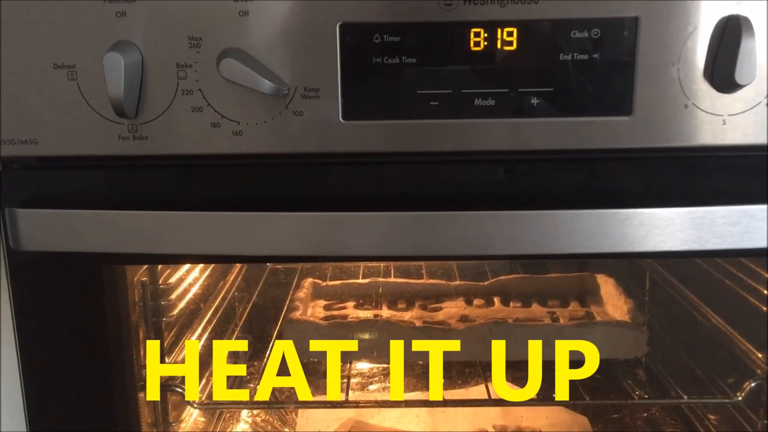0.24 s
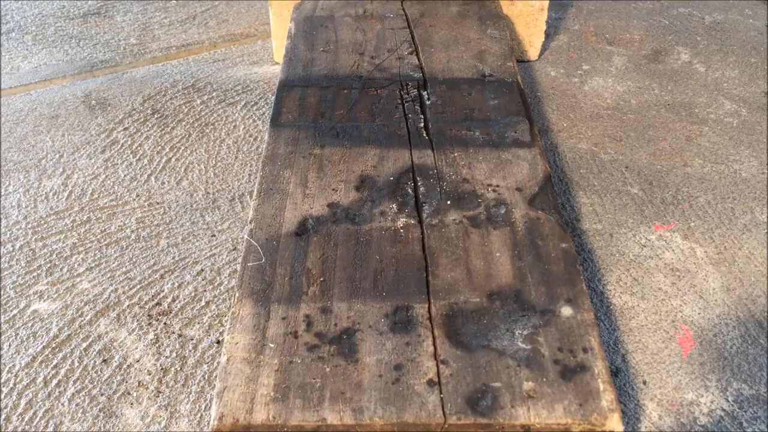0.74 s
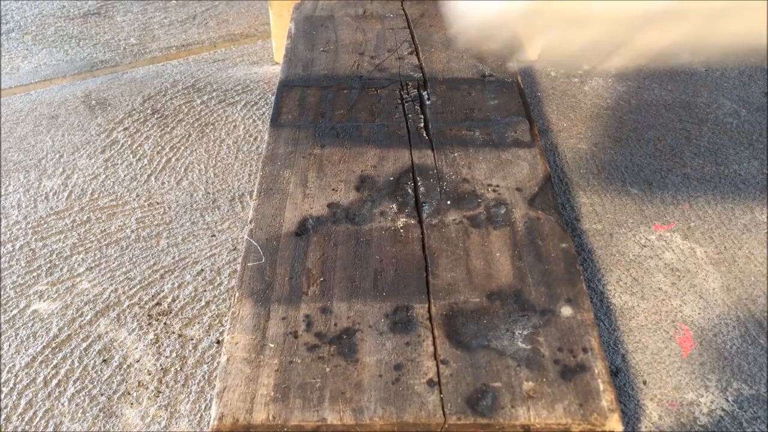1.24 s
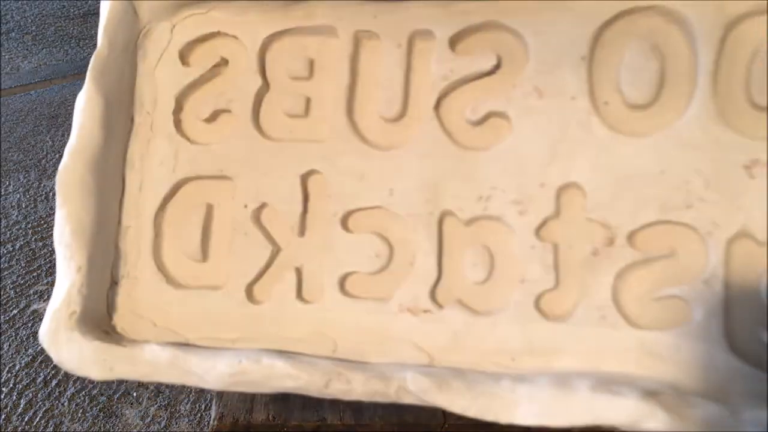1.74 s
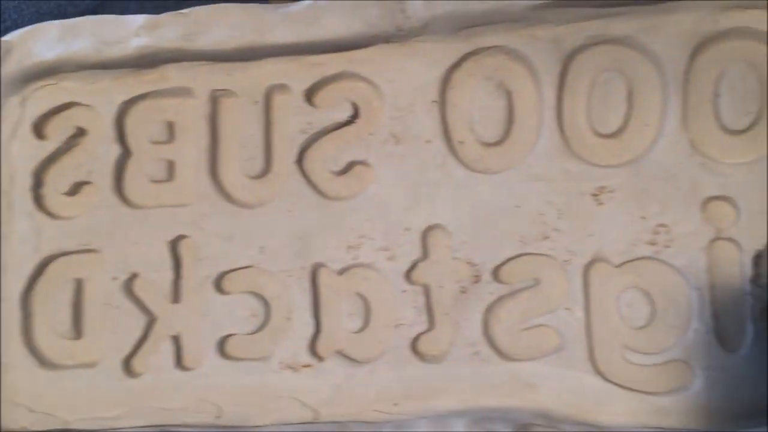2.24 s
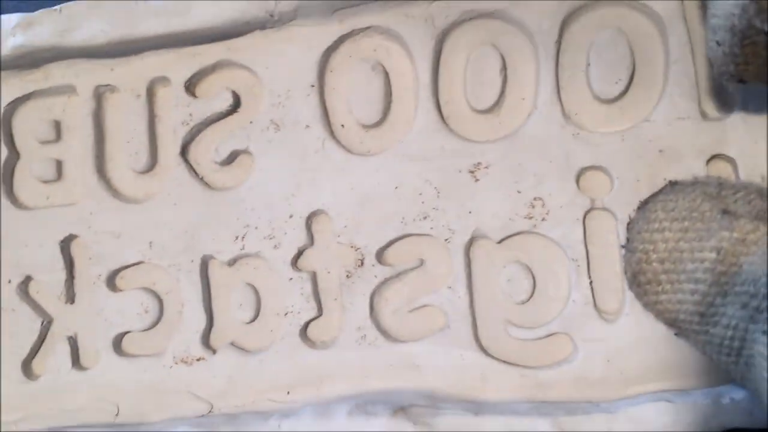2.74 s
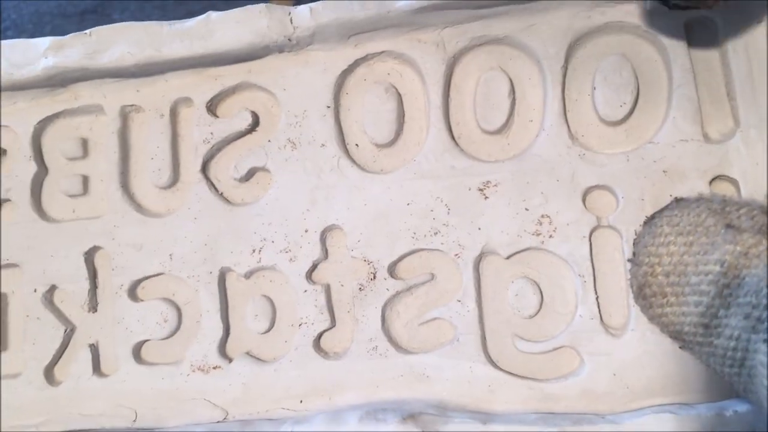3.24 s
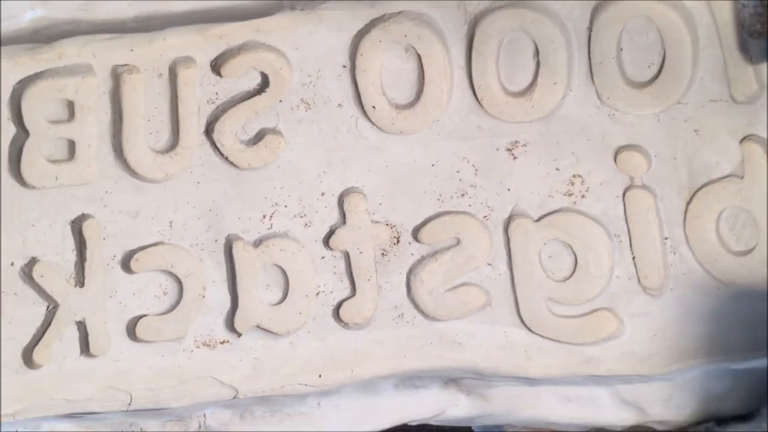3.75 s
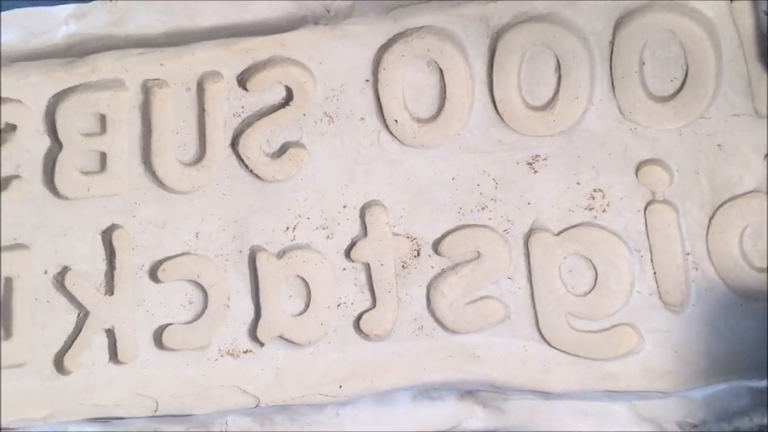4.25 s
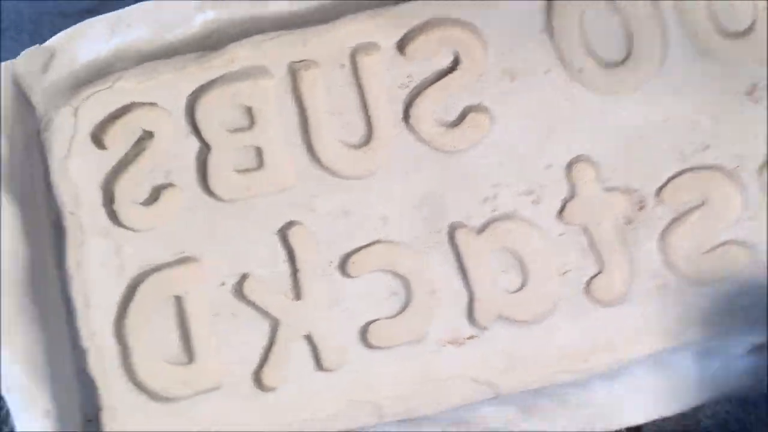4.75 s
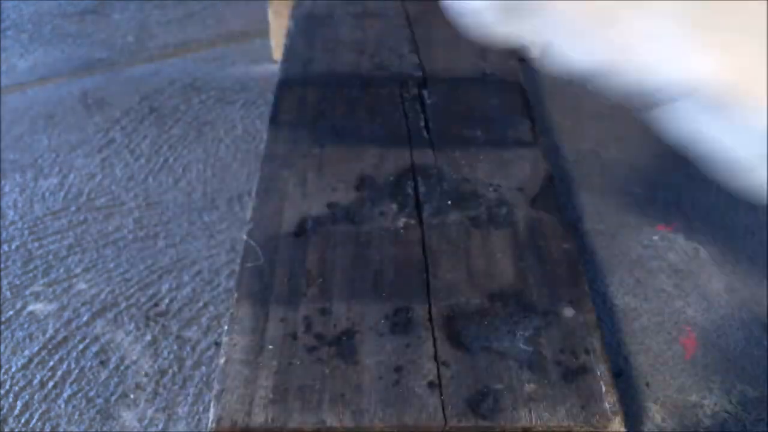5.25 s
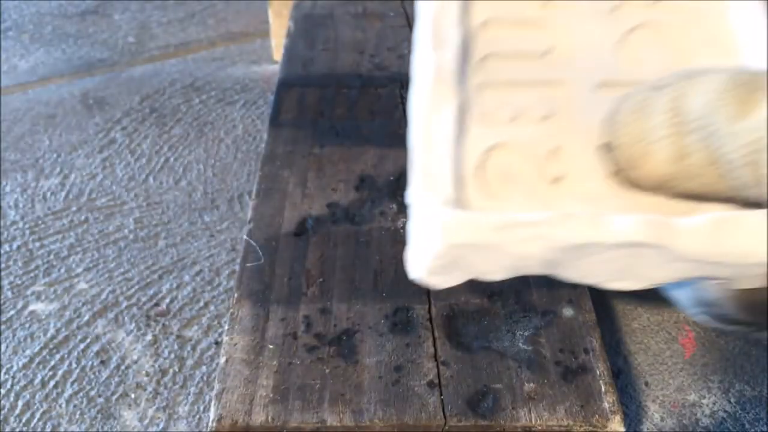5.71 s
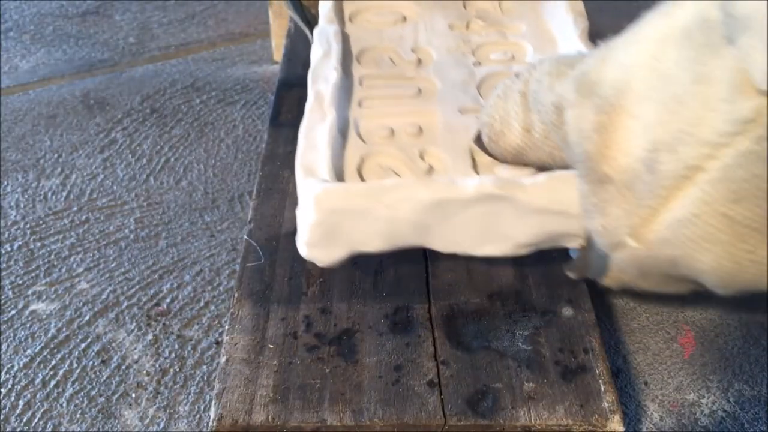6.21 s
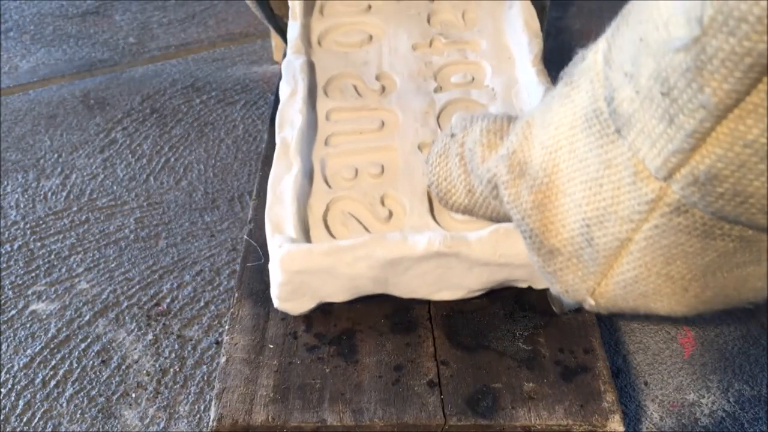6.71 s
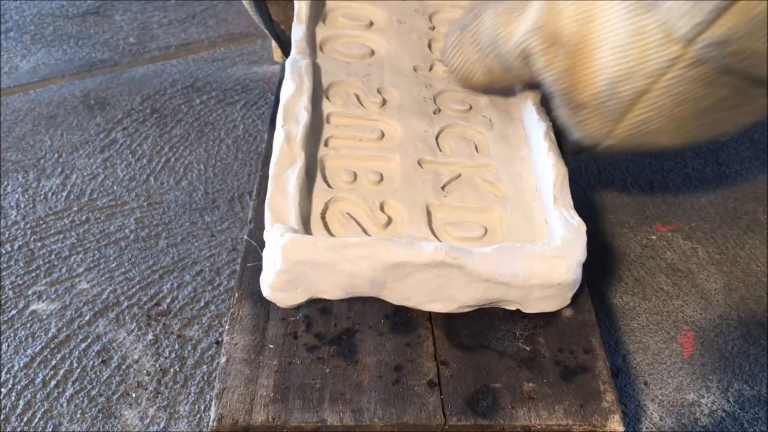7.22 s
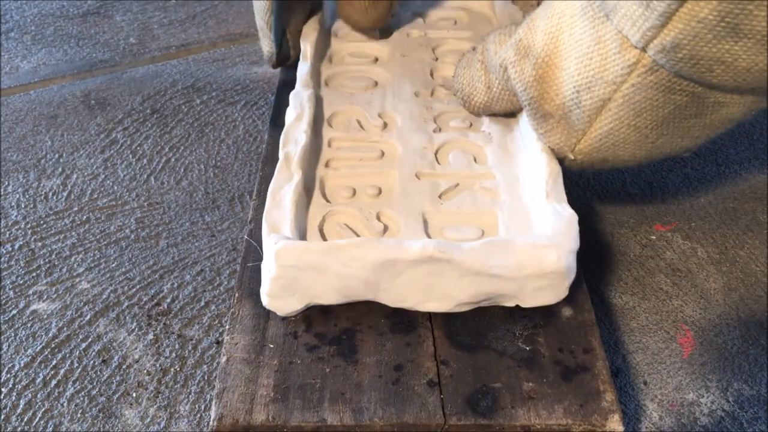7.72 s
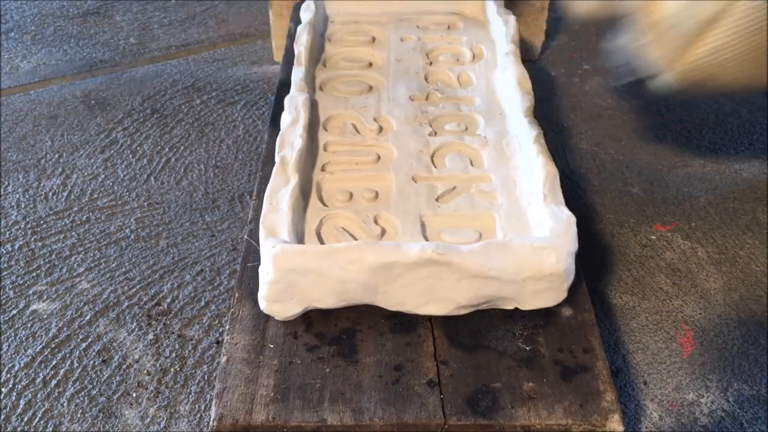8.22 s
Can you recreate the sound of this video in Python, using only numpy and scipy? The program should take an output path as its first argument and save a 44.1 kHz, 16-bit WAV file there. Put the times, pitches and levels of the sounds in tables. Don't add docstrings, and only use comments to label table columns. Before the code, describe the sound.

From 0 to 0.7 seconds, a quiet kitchen: low oven-fan hum and soft airy rumble, picked up by a handheld phone, with a firm dull handling bump at the very start and several fainter ones after. It drops to a blink of silence, and at about 0.77 a gas-fired furnace outdoors cuts in abruptly with a brief low thump. The roar is much louder, deep and steady but fluttering, with booming chamber resonances, a faint breathy whistle from the burner tube and thin gas hiss above. The hiss dulls and brightens slightly as a gloved hand carries a plaster mould past, and the weakest treble occasionally drops out. Around 5.55 to 5.7 the mould touches a wooden plank with a quick light triple tick, slightly gritty. At 7.13 comes a firmer, short woody knock. The roar continues unchanged until the end at about 8.5 seconds.

```python
import sys
import numpy as np
from scipy import signal
from scipy.fft import rfft, irfft, next_fast_len
from scipy.io import wavfile
from scipy.ndimage import uniform_filter1d

SR = 44100
rng = np.random.default_rng(int(sys.argv[2]) if len(sys.argv) > 2 else 0)


def int16_out(signal):
    q = np.round(np.clip(np.atleast_2d(signal).T, -1, 1) * 32767)
    wavfile.write(sys.argv[1], SR, q.astype(np.int16))


def boost(x):
    u = np.asarray(x, float) / 20
    return 10 ** u


N = 373527
CUT_S = .77025


def evened(x):
    return x / np.sqrt(np.mean(x ** 2) + 1e-20)


def read_db(points, hz):
    f, db = np.transpose(points)
    return np.interp(np.log(hz + 1), np.log(f + 1), db)


def modes_db(modes, hz, steep):
    power = sum(boost(db) ** 2 / (1 + (2 * (hz - f) / width) ** 2) ** steep for f, width, db in modes)
    return 10 * np.log10(power + 1e-12)


def patches(shape, bins, frames):
    field = rng.standard_normal(shape[::-1]).T
    for _ in range(2):
        field = uniform_filter1d(field, size=bins, axis=0)
        field = uniform_filter1d(field, size=frames, axis=1)
    return evened(field)


def turbulence(colour_db, patchy_db, flicker_db, drift_db, size, count=N):
    hop = size // 4
    re, im = rng.standard_normal((count // hop + 5, size // 2 + 1, 2)).T
    quick = patches(re.shape, bins=4, frames=6)
    drift = patches(re.shape, bins=size // 200, frames=16000 // hop)
    flicker = evened(uniform_filter1d(rng.standard_normal(re.shape[1]), size=3))
    gain = boost(patchy_db * quick + flicker_db * flicker + drift_db * drift)
    white = signal.istft((re + 1j * im) * gain, nperseg=size, noverlap=size - hop)[1][:count]
    length = next_fast_len(count)
    colour = boost(colour_db(np.fft.rfftfreq(length, 1 / SR)))
    return evened(irfft(rfft(white, length) * colour, length)[:count])


def fan_air():
    # frequency in Hz, level in dB.
    rumble_colour = [(12, -42), (20, -12), (59, 2), (108, 3), (166, 0), (199, 2), (260, -25), (340, -53),
                     (570, -120)]
    # frequency in Hz, level in dB.
    air_colour = [(130, -29), (205, -3), (253, -14), (330, -7), (551, -27), (1310, -27), (1600, -33),
                  (15000, -53)]

    def air_db(hz):
        return read_db(air_colour, hz) - 40 * np.log10(1 + (150 / (hz + 1)) ** 2)

    rumble = turbulence(lambda hz: read_db(rumble_colour, hz), patchy_db=.4, flicker_db=.3, drift_db=.3,
                        size=1024, count=SR)
    air = turbulence(air_db, patchy_db=1.1, flicker_db=.4, drift_db=.6, size=1024, count=SR)
    t = np.arange(SR) / SR
    settling_db = 5 * np.exp(-(t / .08) ** 2)
    return boost(-51.5 + settling_db) * rumble + boost(-58) * air


def fan_hum(t):
    # frequency in Hz, level in dB, depth of waver from 0 to 1.
    hum_lines = [(100, -58, .4), (117.5, -57, .6), (199.7, -51, .1), (327.5, -60.5, .7), (491, -75, .6),
                 (625, -80, .5), (655, -80, .6), (982, -72, .6), (1187, -85, .6), (1311, -80, .6),
                 (1637, -75.5, .3), (1965, -86, .5)]
    out = np.zeros(len(t))
    for (hz, db, depth), (rate, p, q) in zip(hum_lines, rng.random((len(hum_lines), 3))):
        waver = 1 + np.clip(depth, 0, 1) * np.sin(2 * np.pi * ((2.38 + 3.3 * rate) * t + p))
        out += np.sqrt(2) * boost(db) * waver * np.sin(2 * np.pi * (hz * t + q))
    return out


def handling_bumps(t):
    # centre in seconds, peak in dB, frequency in Hz, length in seconds.
    bumps = [
        (.058, -31.5, 65, 0.048),
        (0.1, -41, 60, .04),
        (0.212, -47, 55, .05),
        (0.443, -43, 50, .08),
        (0.502, -40, 75, .05),
        (.65, -43, 70.5, .06),
    ]
    out = np.zeros(len(t))
    for s, db, hz, length in bumps:
        swell = np.exp(-(3 * (t - s) / length) ** 2)
        out += boost(db) * swell * np.sin(2 * np.pi * hz * (t - s))
    return out


def kitchen():
    t = np.arange(SR) / SR
    return np.pad(fan_air() + fan_hum(t) + handling_bumps(t), (0, N - SR))


def splice():
    since = np.maximum(np.arange(N) / SR - CUT_S, 0)
    wave = np.cos(2 * np.pi * 250 * since - 1.15)
    return (since > 0) * .56 * wave * np.exp(-(since / .004) ** 2)


def knocks():
    # start in seconds, peak in dB, rise in seconds, t60 in seconds, pitch factor.
    hits = [
        (5.5525, -23, .001, .018, 1.12),
        (5.598, -26, .001, .02, .9),
        (5.699, -27, .001, .02, 1.5),
        (7.1305, -24, .0008, .04, 1.0),
        (7.1355, -17, .0008, .032, 1.02),
    ]
    # frequency in Hz, level in dB.
    plank = [(950, -18), (1190, 0), (1320, -10), (1900, -13), (2680, -12), (3500, -17)]
    out, t = np.zeros(N), np.arange(4000) / SR
    grit_band = signal.butter(4, (1000, 2300), "bandpass", fs=SR, output="sos")
    for (s, db, rise, t60, pitch), dust in zip(hits, rng.standard_normal((len(hits), len(t)))):
        ring = sum(boost(d) * np.sin(2 * np.pi * hz * pitch * t) for hz, d in plank) * boost(-60 * t / t60)
        grit = evened(signal.sosfilt(grit_band, dust)) * boost(-11 - 60 * t / .03)
        at = round(s * SR)
        out[at:at + len(t)] += (ring + grit) * boost(db) * (1 - np.exp(-t / rise))
    return out


def nozzle_hiss():
    # frequency in Hz, width in Hz, level in dB.
    nozzle_peaks = [(6420, 120, 0), (6560, 90, -1), (7150, 400, -6), (7950, 200, -9), (8550, 120, -6),
                    (8690, 90, -4), (8950, 250, -7), (9500, 150, -9), (10700, 500, -8), (11350, 150, -11),
                    (12270, 80, -9), (12950, 150, -3), (13260, 280, -7), (14700, 300, -19),
                    (15650, 200, -10)]
    # frequency in Hz, level in dB.
    nozzle_bed = [(5300, -38), (6000, -10.5), (9000, -13.5), (12000, -12.5), (13800, -13), (15100, -15),
                  (15700, -16)]

    def nozzle_db(hz):
        return 10 * np.log10(boost(modes_db(nozzle_peaks, hz, 1.0)) ** 2 + boost(read_db(nozzle_bed, hz)) ** 2)

    hiss = turbulence(nozzle_db, patchy_db=.7, flicker_db=.6, drift_db=1.2, size=512)
    echo = np.roll(hiss, round(.0066 * SR))
    return evened(hiss + boost(-20) * echo)


def burner_tube():
    # frequency in Hz, width in Hz, level in dB.
    low_modes = [(1038, 27, -9.5), (1218, 110, -5), (1610, 122, -3.5), (1661, 16, 2.5), (1767, 29, -4.5),
                 (1838, 72, -3.5), (2400, 195, -15.5), (2520, 35, -2.5), (2668, 94, -12)]
    # frequency in Hz, width in Hz, level in dB.
    high_modes = [(2994, 190, 2.5), (3250, 25, 3.5), (3496, 185, 2.5), (3540, 140, -8.5), (3780, 200, -7.5),
                  (4117, 66, 3), (4290, 120, -7.5), (4714, 73, -7), (4610, 140, -2.5), (4880, 120, -15),
                  (4980, 67, -5), (5125, 90, -5), (5430, 67, -8.5), (5604, 26, 3.5), (5660, 200, -2)]
    jet = turbulence(lambda hz: modes_db(low_modes, hz, 1.26), patchy_db=0.98, flicker_db=0.52,
                     drift_db=1.4, size=512)
    whistles = turbulence(lambda hz: modes_db(high_modes, hz, 1.44), patchy_db=0.67, flicker_db=0.28,
                          drift_db=2.2, size=512)
    return jet, whistles


def flame_roar():
    # frequency in Hz, width in Hz, level in dB.
    chamber = [(66, 16.6, -8.5), (96.4, 33, -5.5), (145.8, 23, -3.5), (171, 36, -0.5), (242.7, 48.4, -0.5),
               (283.2, 27, -5.5), (344, 56, -2), (373, 25, -5), (404.5, 18, -6.5)]
    # frequency in Hz, width in Hz, level in dB.
    upper_modes = [(472, 18, 4.5), (483.4, 13.5, 1.5), (546, 12, -9), (574, 55, -3.5), (669, 35, -12),
                   (708.3, 29.5, -7.5), (783, 27, -12.5), (904, 45, -16.5)]

    def chamber_db(hz):
        return modes_db(chamber, hz, 1.675) - 30 * np.log10(1 + (55 / (hz + 1)) ** 2)

    roar = turbulence(chamber_db, patchy_db=0.098, flicker_db=0.55, drift_db=0.51, size=1024)
    overtones = turbulence(lambda hz: modes_db(upper_modes, hz, 1.51), patchy_db=1.7, flicker_db=0.73,
                           drift_db=0.96, size=512)
    return roar + boost(-20) * overtones


def furnace():
    # steady level in dB, share of the shading from 0 to 1.
    layers = [
        (-16.5, 0.11),
        (-39.5, 0.28),
        (-44.5, 0.75),
        (-49, 0.94),
    ]
    # time in seconds, change of the hiss in dB.
    shade = [(0.78, 3), (1.3, 3), (1.58, -2), (2.3, 1.5), (2.7, 0), (4.1, 0.5), (4.75, 1.5), (5.2, -1.5),
             (5.6, 2.5), (5.95, -1), (6.4, -1.5), (6.9, -0.5), (7.35, 0.2), (7.8, -1.5), (8.05, -1.5),
             (8.47, -2)]
    times, change_db = np.transpose(shade)
    shade_db = np.interp(np.arange(N) / SR, times, change_db)
    sources = [flame_roar(), *burner_tube(), nozzle_hiss()]
    return sum(boost(db + share * shade_db) * source for (db, share), source in zip(layers, sources))


def scene():
    t = np.arange(N) / SR
    indoors = np.interp(t, [0, .702, .7045, .716, .722], [1, 1, .1, .06, 0])
    outdoors = 1 - np.exp(-(np.maximum(t - CUT_S, 0) / .004) ** 2)
    return (indoors * kitchen() + outdoors * furnace() + knocks())[None]


def starve(x):
    # middle in seconds, level in dB under which partials are lost.
    starved = [(.510, -62), (.553, -63), (.702, -62), (.787, -23), (.937, -27), (1.321, -30), (2.516, -27),
               (3.284, -26), (3.497, -28), (3.625, -27), (3.988, -28), (4.222, -27), (4.542, -26),
               (4.841, -28), (4.969, -26), (4.990, -26), (5.374, -27), (5.481, -27), (6.334, -29),
               (7.422, -26), (7.444, -25), (7.849, -27), (7.892, -27), (7.998, -24), (8.404, -28)]
    block, first = 941, 810
    n, k = np.arange(2 * block) + .5, np.arange(block) + .5
    basis = np.cos(np.pi / block * np.outer(n + block / 2, k)) * np.sqrt(2 / block)
    basis *= np.sin(np.pi * n / (2 * block))[:, None]
    lead, hz = 2 * block - first, k * SR / (2 * block)
    halves = np.pad(x, (lead, 3 * block))[:(N // block + 4) * block].reshape(-1, block)
    z = np.hstack([halves[:-1], halves[1:]]) @ basis
    band = uniform_filter1d(uniform_filter1d(z ** 2, size=12, axis=1), size=2, axis=0)
    for s, keep_db in starved:
        at = round((s * SR + lead) / block) - 1
        step = boost(keep_db - 5 * np.log2(np.maximum(hz, 2500) / 4000) - 4 * (hz < 2000))
        z[at] *= 1 - 1 / (1 + (z[at] / step) ** 12)
    usual = uniform_filter1d(band, size=60, axis=0) + 1e-20
    late = np.arange(len(z))[:, None] * block > 1.4 * SR
    top = late & (hz > 13450) & (hz < 14900)
    z *= 1 - top / (1 + (band / usual / boost(-3.4) ** 2) ** 12)
    back = z @ basis.T
    return (back[1:, :block] + back[:-1, block:]).ravel()[lead - block:][:N]


def band_limit(x):
    return signal.sosfilt(signal.butter(12, 16530, fs=SR, output="sos"), x)


def record(dry):
    soft = 1.6 * np.tanh(dry / 1.6)
    treble_edge = signal.firwin(1023, 15800, window=("kaiser", 9), fs=SR)
    thinned = signal.oaconvolve(starve(soft[0]), treble_edge, "same")
    mix = thinned[None] * (dry != 0) + splice()
    return band_limit(mix)


dry = scene()
out = record(dry)
int16_out(out)
```